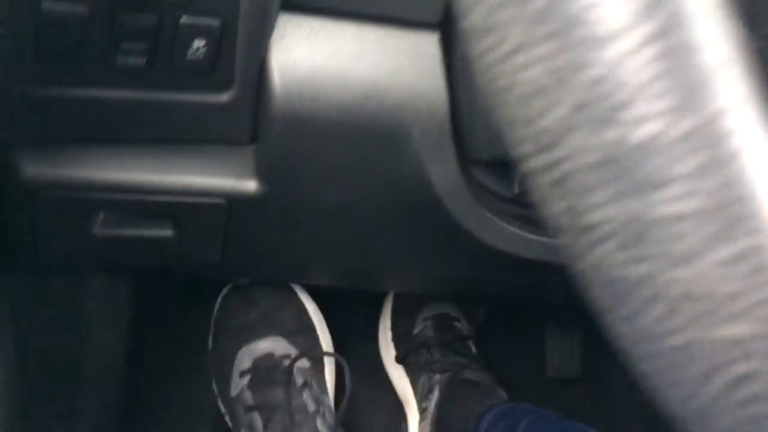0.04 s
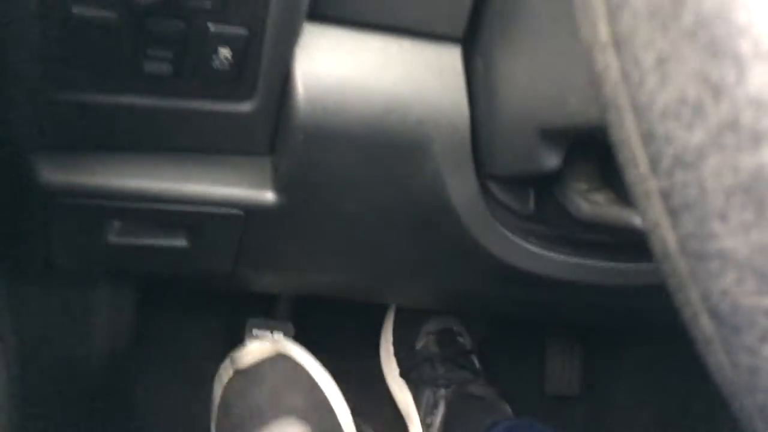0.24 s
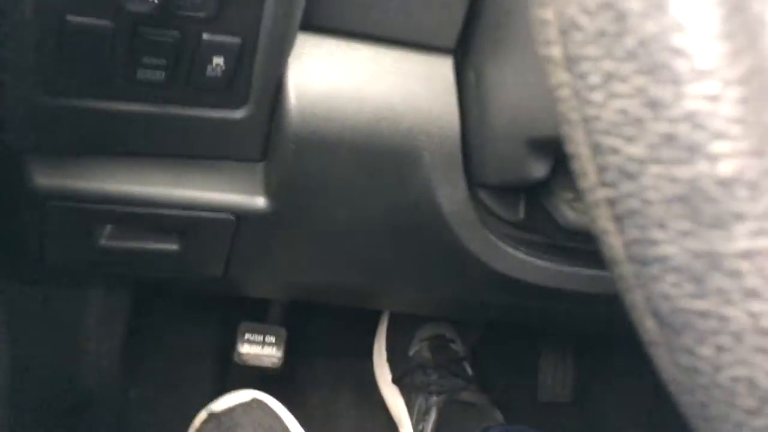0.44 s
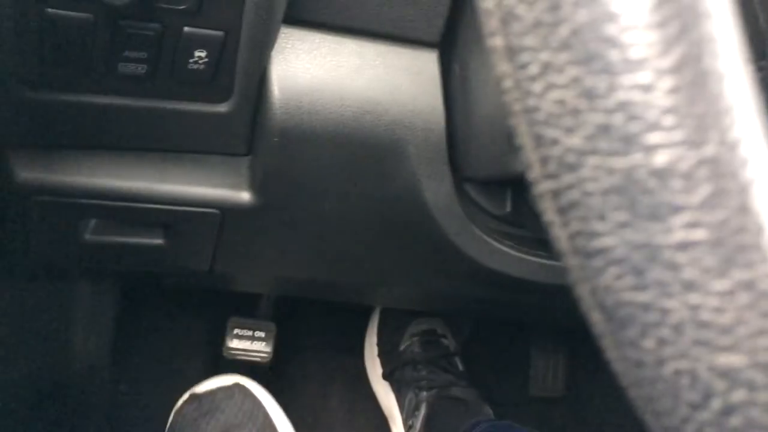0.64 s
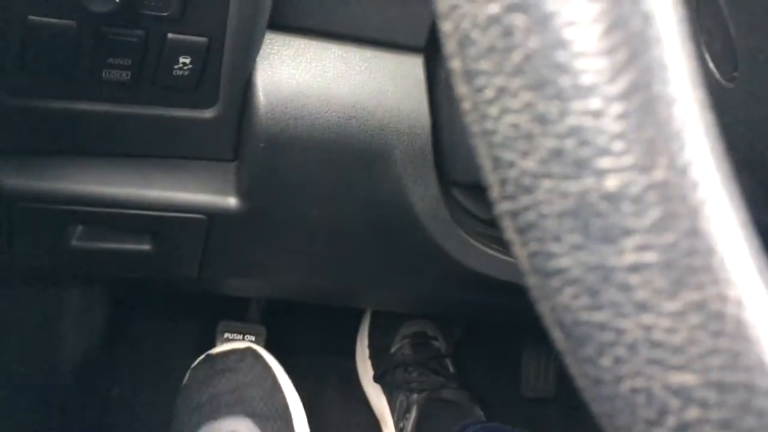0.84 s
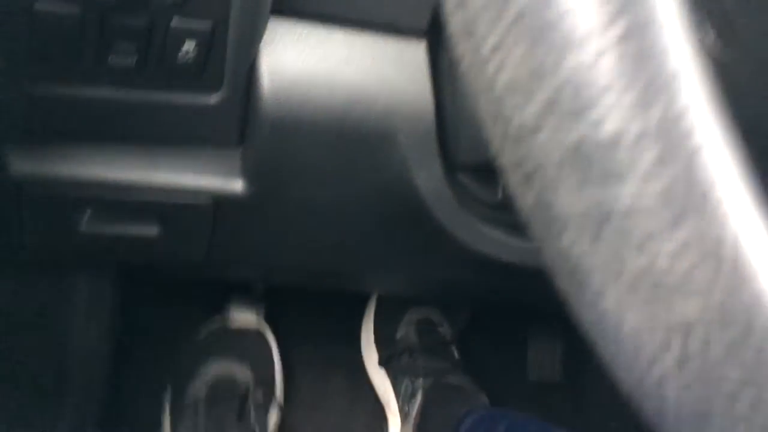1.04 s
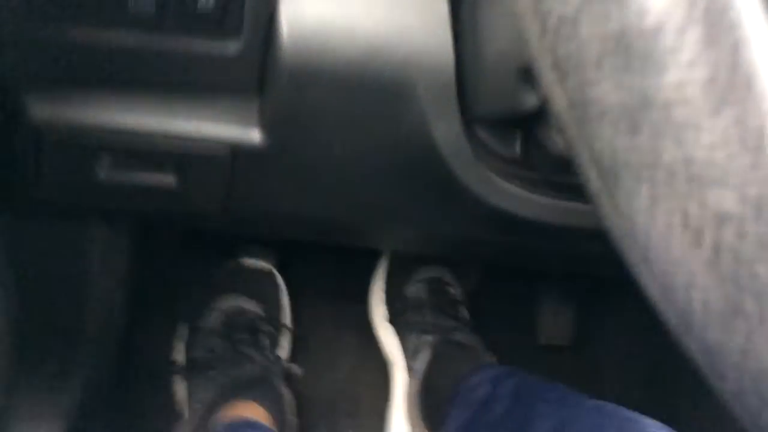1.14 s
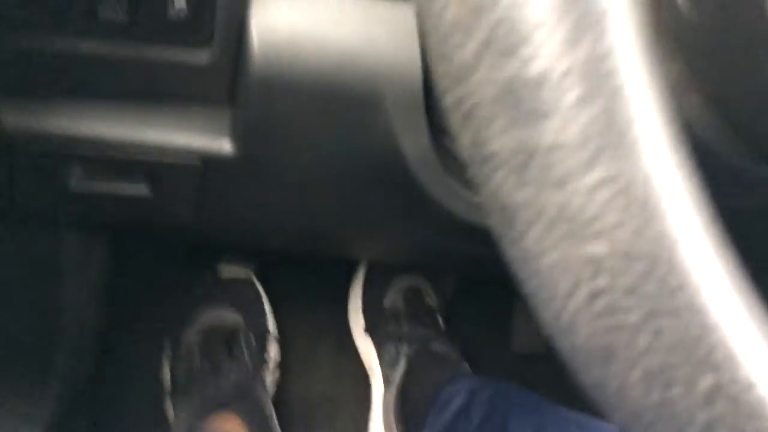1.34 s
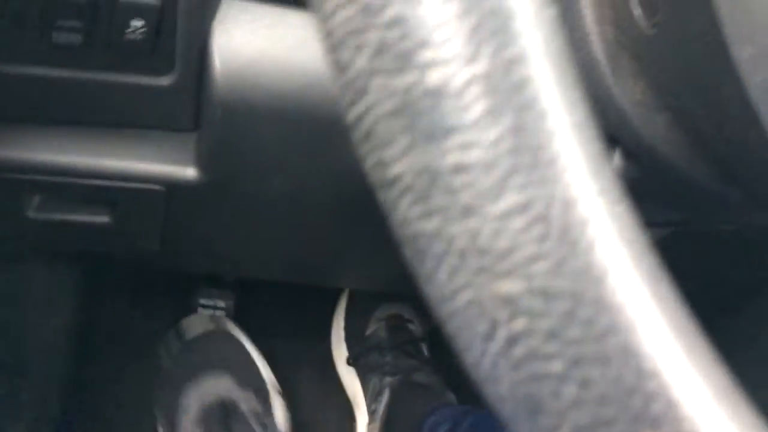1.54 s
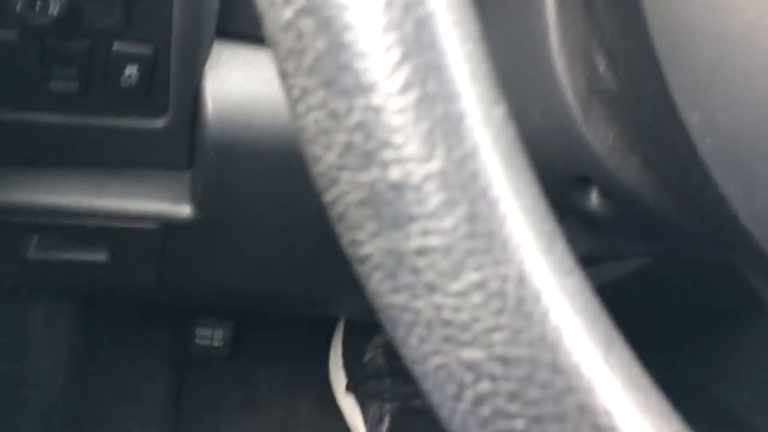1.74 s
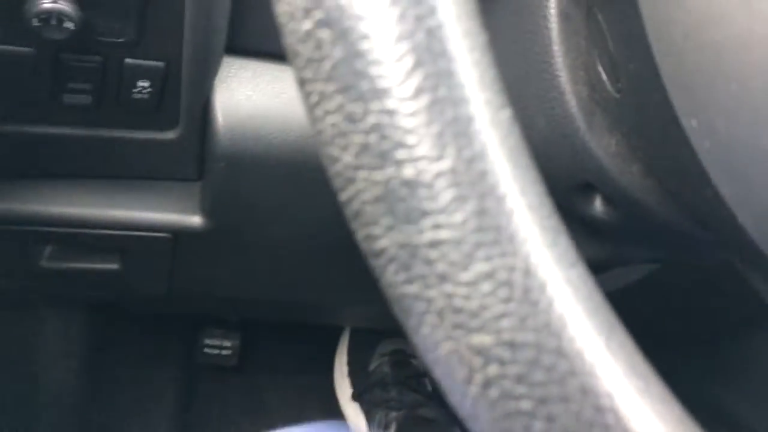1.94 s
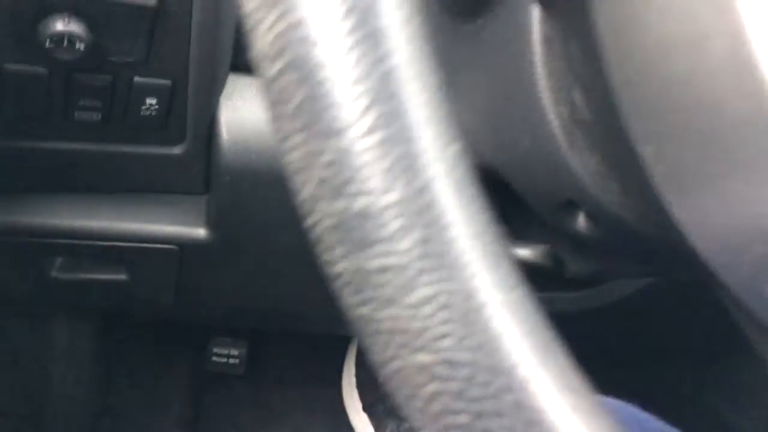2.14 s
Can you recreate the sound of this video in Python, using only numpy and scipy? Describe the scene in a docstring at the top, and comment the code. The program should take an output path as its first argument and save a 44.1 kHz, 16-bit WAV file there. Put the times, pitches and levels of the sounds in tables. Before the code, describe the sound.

A parking-brake pedal releases with a snap and a thump, then is pressed down again with a quick run of ratchet clicks. A shoe thuds onto the footrest. Heard close in a quiet car with faint rumble and clothing rustle.

```python
"""In the driver's seat of a quiet, padded car cabin, a foot works the parking-brake pedal. A push creaks the
pivot and snaps the latch free; the pedal thumps up against its stop and the pawl rattles. The shoe taps back on
and presses it over eight ratchet teeth, slowing towards the last, then drops to the footrest and the booming
floor. Clothes and the scuffing shoe rustle over a low rumble and hum."""
import sys
import numpy as np
from scipy.fft import rfft, irfft, next_fast_len
from scipy.io import wavfile
from scipy.ndimage import map_coordinates

SR = 44100
rng = np.random.default_rng(int(sys.argv[2]) if len(sys.argv) > 2 else 0)


def store_wav(level_fs):
    """Save 16-bit WAV to argv[1]."""
    pcm = np.round(np.clip(np.atleast_2d(level_fs), -1, 1) * 32767)
    wavfile.write(sys.argv[1], SR, pcm.T.astype(np.int16))


N = 97020

# How fast the cabin soaks up a knock: freq_hz, t60_s
CABIN_DECAY = [(100, 0.072), (400, .105), (1200, 0.081), (3500, 0.028), (12000, 0.024)]
# Tones of the low hum: pitch_hz, level_db
HUM_TONES = [(34.5, -54.5), (167, -56), (239, -52.5)]
# Swells of rustle, from cloth and from the shoe rubbing on the pedal: time_s, level_db
RUSTLE_SWELLS = [(0, -49), (.14, -55), (.35, -60.5), (.5, -67), (.65, -61), (.92, -65), (1.04, -48.5),
                 (1.07, -47), (1.22, -51), (1.3, -58), (1.355, -66), (1.375, -50.5), (1.52, -54.5),
                 (1.6, -62), (1.8, -57.5), (1.84, -57), (1.895, -51), (1.96, -67), (2.015, -59),
                 (2.055, -51.5), (2.12, -52.5), (2.2, -52)]

# Tone colour of each noise and knock: freq_hz, gain_db
RUMBLE_EQ = [(20, -9), (34, 5.5), (50, 4), (80, 1.5), (120, 5), (170, 0.5), (240, -3), (300, -16),
             (450, -14.5), (800, -27.5), (2000, -45.5), (5000, -52.5), (15000, -60.5)]
RUSTLE_EQ = [(200, 15.5), (600, 2.5), (1000, 1.5), (2200, -2), (4000, -7), (8000, -12.5), (12000, -16.5),
             (15000, -18)]
PIVOT_EQ = [(100, -9.5), (350, 0.5), (800, -18), (1100, -7), (1350, -2.5), (1620, 5.5), (2000, -8),
            (2550, -4.5), (3200, -19.5), (5000, -33), (15000, -45.5)]
RATTLE_EQ = [(500, -3.5), (1600, -12), (2100, -13), (3600, -8), (4900, -2), (5800, -10.5), (7000, -10.5),
             (9500, -15), (15000, -25.5)]
LATCH_EQ = [(50, -17.5), (170, -2.5), (480, -2), (750, -3.5), (1150, -6), (1600, 3.5), (2000, -3.5),
            (3500, -2), (4900, -1), (5700, -8), (7200, -4), (9500, -15.5), (15000, -28)]
TRIM_EQ = [(100, -6), (350, 0.5), (550, -7.5), (800, -9.5), (1300, -17), (3000, -26), (15000, -44.5)]
SOLE_EQ = [(60, -1.5), (200, 12.5), (330, -3), (600, -2.5), (900, -12), (1700, -12), (2400, -37),
           (5000, -33), (15000, -56)]
LINKAGE_EQ = [(100, -10), (400, 0.5), (900, -6.5), (1300, -5.5), (1650, -3), (2100, -1), (2550, 3),
              (4200, -8), (5300, -4), (8000, -14), (15000, -24)]
PAWL_EQ = [(150, -3), (300, 1), (480, -4), (750, -7), (1150, -0.5), (1500, -8), (2400, -3), (3050, 0),
           (4500, -1.5), (5500, 1.5), (7300, -6.5), (9400, -7.5), (11000, -9.5), (15000, -12)]
SHOE_EQ = [(80, 8), (250, 4.5), (420, 12.5), (680, -13), (950, -3.5), (1130, -17), (1450, -9), (1900, -4),
           (2600, -12), (3800, -28), (7000, -32.5), (15000, -55)]

# Ring of each struck part: pitch_hz, level_db, t60_s
FLOOR_MODES = [(72, -23.5, .15), (122, 4, .17), (144.4, 3, 0.21), (196.4, -11.5, 0.26)]
LATCH_MODES = [(190, -3.5, .12), (502, -7, .09), (1435, -8.5, 0.075), (1635, 2.5, .056), (2034, -7, 0.071),
               (2545, -4.5, .045), (2740, -7.5, 0.052), (4260, -10.5, .04), (4910, -6, .045),
               (4970, -7.5, 0.034)]
BRACKET_MODES = [(47.4, -26.5, 0.51), (91.8, -11, .24), (127, -2, 0.15), (160.2, -7, 0.4),
                 (181.9, 2.5, 0.17), (348.2, -10, 0.097), (404, -10, 0.071)]
SOLE_MODES = [(89, -8.5, 0.088), (189, 1, 0.24), (215, 0.5, 0.14)]
PAWL_MODES = [(1125, -6, .07), (1720, -13, .07), (1921, -9, .05), (2700, -7, .04), (3005, 1, .05),
              (3060, -1, .045), (3430, -4, .045), (3820, -4, .045), (3965, -1.5, .042), (4672, -4, .036),
              (4930, -4, .036), (5330, -4, .04), (5517, 1, .042), (6476, -4, .04), (7500, -9, .03),
              (8624, -10, .028), (9485, -5, .032), (11030, -10, .03), (12085, -10, .03), (12715, -7, .03),
              (13824, -11, .03)]
SECTOR_MODES = [(209.8, 1.5, 0.091), (270, -7, 0.077), (426, -12, 0.11), (491, -2.5, 0.06)]
FOOTREST_MODES = [(208.3, -7.5, 0.04), (276, -17, 0.065), (411, 5.5, 0.035), (495, -6, .05),
                  (1134, -10, 0.043)]

# Feet on the floor: start_s, level_db, pitch_ratio
FLOOR_THUDS = [(0.002, -34.5, 1.3), (0.0314, -34, 1.3), (0.067, -34, 0.88), (0.1033, -36, 1.2),
               (1.047, -39.5, 0.79), (1.4547, -21, 1.004), (1.4734, -22.5, 1.0), (1.552, -39.5, 0.9),
               (1.839, -36, 0.68), (2, -47, 0.62)]
# Cues for pivot, loose pawl and latch: start_s, level_db
PIVOT_CREAKS = [(0.1764, -32.5)]
PAWL_RATTLES = [(0.2040, -34), (0.2594, -38), (0.2832, -43), (0.3014, -57.5)]
LATCH_SNAPS = [(0.2249, -18)]
# Jolts of the pedal's bracket: start_s, level_db, dullness_db_per_octave
PEDAL_JOLTS = [(0.2297, -19, -2.3), (0.2498, -17, 1.5), (0.2596, -13.5, 0.5), (0.2926, -29, 7),
               (0.3341, -41, 12)]
# Sole meeting pedal: start_s, level_db
SOLE_TAPS = [(0.9565, -27.5)]
# Slack closing in the linkage: start_s, level_db, brightness_db_per_octave
LINKAGE_CLACKS = [(0.999, -39, 2.5), (1.006, -32.5, 0.3), (1.3650, -59.5, 1.2), (1.4040, -37, -4.5),
                  (1.4152, -39, -5.5)]
# Pawl dropping over each tooth: start_s, click_db, sector_ring_db
RATCHET_TEETH = [(1.0736, -21.5, -22), (1.0872, -22, -24.5), (1.0985, -22.5, -19), (1.1105, -22, -20),
                 (1.1284, -24, -23), (1.1558, -24.5, -19), (1.1862, -24, -24.5), (1.2642, -23.5, -30)]
# Shoe meeting footrest: start_s, level_db
SHOE_LANDINGS = [(1.4433, -20)]


def amp(db):
    return 10 ** (np.asarray(db) / 20)


def unit_rms(x):
    return x / np.sqrt(np.mean(x ** 2, axis=-1, keepdims=True) + 1e-20)


def decay(t, t60_s):
    return np.exp(-np.log(1000) * t / t60_s)


def curve_at(points, hz):
    """Read a curve along a log frequency axis."""
    freqs, values = np.transpose(points)
    return np.interp(np.log(hz + 1), np.log(freqs + 1), values)


def filtered(x, gain):
    """Shape x with a gain that depends on frequency."""
    size = next_fast_len(N + SR // 2)
    return irfft(rfft(x, size) * gain(np.fft.rfftfreq(size, 1 / SR)), size)[:N]


def noise(eq):
    """Steady coloured noise of rms 1."""
    return unit_rms(filtered(rng.standard_normal(N), lambda hz: amp(curve_at(eq, hz))))


def wobble(rate_hz):
    """A smooth random drift."""
    knots = rng.standard_normal(int(N * rate_hz / SR) + 4)
    return map_coordinates(knots, [np.arange(N) * rate_hz / SR])


def add(track, start_s, sound):
    i = max(0, round(start_s * SR))
    track[i:i + len(sound)] += sound[:N - i]


def knock(eq, rise_s, decay_scale=1, tilt_db=0):
    """A blow's dense resonances: bands of noise, each dying away at its own rate in the cabin."""
    t = np.arange(SR // 3) / SR
    hz = np.geomspace(50, 16000, 36)[:, None]
    bands_away = np.log((np.fft.rfftfreq(len(t), 1 / SR) + 1) / hz) / np.log(hz[1] / hz[0])
    band_shapes = np.sqrt(np.maximum(1 - abs(bands_away), 0))
    bands = irfft(rfft(rng.standard_normal((len(hz), len(t)))) * band_shapes, len(t))
    hold_s = .003  # the footwell's first echoes sustain the knock
    body = decay(np.maximum(t - hold_s, 0), decay_scale * curve_at(CABIN_DECAY, hz))
    tail = amp(-26) * decay(t, t60_s=.16)  # faint late ring of the cabin
    attack = 1 - np.exp(-t / (rise_s + .5 / hz))
    gain = amp(curve_at(eq, hz) + tilt_db * np.log2(hz)) * np.sqrt(hz)
    blow = (unit_rms(bands * (body + tail) * attack) * gain).sum(0)
    return unit_rms(blow) * np.sqrt(SR / 100 / len(t))  # energy of 10 ms at rms 1


def ring(modes, rise_s, dull_db=0):
    """Damped modes, balanced a little differently at each blow; a soft contact dulls the upper ones."""
    t = np.arange(SR // 3) / SR
    hz, db, t60_s = np.transpose(modes)[:, :, None]
    octaves = np.log2(hz) - np.log2(hz).mean()
    level = amp(db + rng.standard_normal(hz.shape) - dull_db * octaves)
    partials = level * np.sin(2 * np.pi * hz * t) * decay(t, t60_s)
    return partials.sum(0) * (1 - np.exp(-t / rise_s))


def cabin_rumble():
    """A steady bed of deep noise."""
    return amp(-48) * noise(RUMBLE_EQ)


def cabin_hum():
    """Low tones that waver in level and pitch."""
    t = np.arange(N) / SR
    out = np.zeros(N)
    for hz, db in HUM_TONES:
        level = amp(db + .94 * wobble(2)) * np.sqrt(2)
        out += level * np.sin(2 * np.pi * hz * t + .41 * wobble(6.3))
    return out


def rustle():
    """Cloth and the shoe rub in soft swells with a slight, fast flutter; the shoe scuffs the pedal around
    1.04-1.22 s."""
    swell_db = np.interp(np.arange(N) / SR, *np.transpose(RUSTLE_SWELLS))
    return amp(swell_db + .47 * wobble(62)) * noise(RUSTLE_EQ)


def floor_thuds():
    """The carpeted floor booms under the feet, each spot at its own pitch."""
    out = np.zeros(N)
    for start_s, db, pitch_ratio in FLOOR_THUDS:
        modes = [(hz * pitch_ratio, level_db, t60_s) for hz, level_db, t60_s in FLOOR_MODES]
        add(out, start_s, amp(db) * ring(modes, rise_s=.002))
    return out


def pivot_creak():
    """The pivot gives one short creak under the first push."""
    out = np.zeros(N)
    for start_s, db in PIVOT_CREAKS:
        add(out, start_s, amp(db) * knock(PIVOT_EQ, rise_s=.006, decay_scale=.38))
    return out


def pawl_rattle():
    """The loose pawl chatters in thin, fading ticks."""
    out = np.zeros(N)
    for start_s, db in PAWL_RATTLES:
        add(out, start_s, amp(db) * knock(RATTLE_EQ, rise_s=.0006, decay_scale=.95))
    return out


def latch_snap():
    """The latch lets go with a hard snap and a brief ring."""
    out = np.zeros(N)
    for start_s, db in LATCH_SNAPS:
        add(out, start_s, amp(db) * knock(LATCH_EQ, rise_s=.0017, decay_scale=.92))
        add(out, start_s, amp(-13.5) * ring(LATCH_MODES, rise_s=.0018))
    return out


def pedal_thump():
    """The pedal springs up against its stop, jolting its bracket and shaking the trim."""
    out = np.zeros(N)
    for start_s, db, dull_db in PEDAL_JOLTS:
        bracket = ring(BRACKET_MODES, rise_s=.002, dull_db=dull_db)
        trim = amp(-15) * knock(TRIM_EQ, rise_s=.001)
        add(out, start_s, amp(db) * (bracket + trim))
    return out


def sole_tap():
    """The rubber sole meets the pedal with a dull tap and a low ring."""
    out = np.zeros(N)
    for start_s, db in SOLE_TAPS:
        add(out, start_s, amp(db) * knock(SOLE_EQ, rise_s=.0001, decay_scale=.76))
        add(out, start_s, amp(-23.5) * ring(SOLE_MODES, rise_s=.002))
    return out


def linkage_clacks():
    """The linkage takes up its play in light clacks as the load on the pedal changes."""
    out = np.zeros(N)
    for start_s, db, tilt_db in LINKAGE_CLACKS:
        add(out, start_s, amp(db) * knock(LINKAGE_EQ, rise_s=.0008, tilt_db=tilt_db))
    return out


def ratchet():
    """The pawl clicks over the teeth, pinging at the same pitches; the toothed sector rings below it."""
    out = np.zeros(N)
    fresh = .96  # each click is mostly new noise
    common = np.sqrt(1 - fresh ** 2) * knock(PAWL_EQ, rise_s=.0009)
    for start_s, click_db, sector_db in RATCHET_TEETH:
        click = common + fresh * knock(PAWL_EQ, rise_s=.0009)
        ping = amp(.5) * ring(PAWL_MODES, rise_s=.0026)
        add(out, start_s, amp(click_db) * (click + ping))
        add(out, start_s, amp(sector_db) * ring(SECTOR_MODES, rise_s=.0018))
    return out


def footrest_landing():
    """The shoe knocks down on the footrest, which rings as it takes the weight."""
    out = np.zeros(N)
    squash_s = .0025  # the sole gives first
    for start_s, db in SHOE_LANDINGS:
        add(out, start_s, amp(db) * knock(SHOE_EQ, rise_s=.00047, decay_scale=.99))
        add(out, start_s + squash_s, amp(-8.5) * ring(FOOTREST_MODES, rise_s=.0031))
    return out


def scene():
    """Mechanism and feet over the cabin's bed, in mono."""
    release = latch_snap() + pedal_thump() + pawl_rattle()
    pedal_travel = pivot_creak() + linkage_clacks() + ratchet()
    feet = sole_tap() + footrest_landing() + floor_thuds()
    bed = cabin_hum() + rustle() + cabin_rumble()
    return (release + pedal_travel + feet + bed)[None]


def record(dry):
    """A steep low-pass trims the very top."""
    cutoff_hz = 15300
    return filtered(dry[0], lambda hz: 1 / np.sqrt(1 + (hz / cutoff_hz) ** 120))[None]


dry = scene()
out = record(dry)
store_wav(out)
```